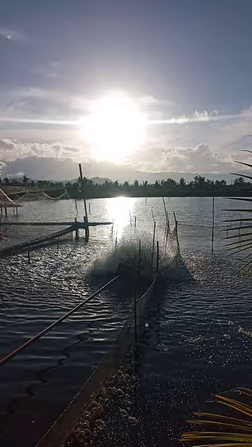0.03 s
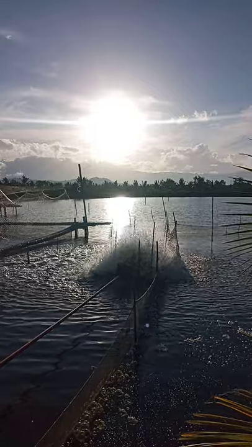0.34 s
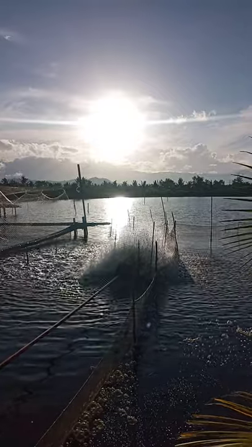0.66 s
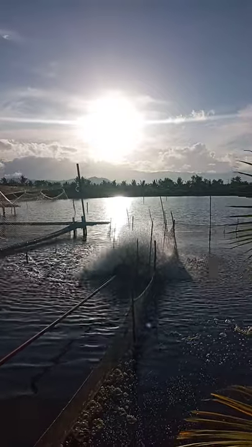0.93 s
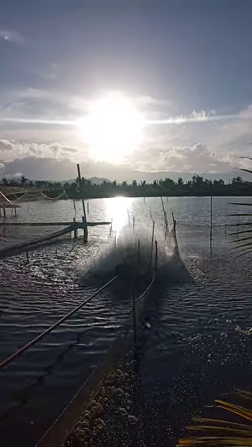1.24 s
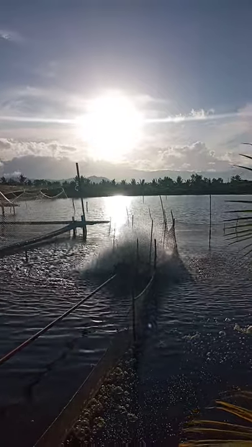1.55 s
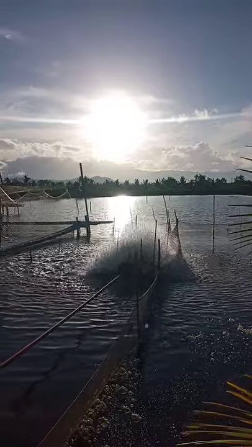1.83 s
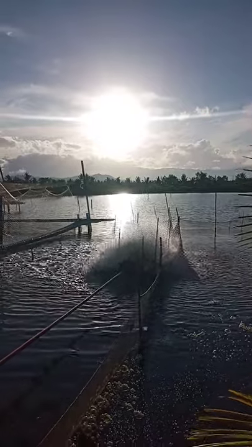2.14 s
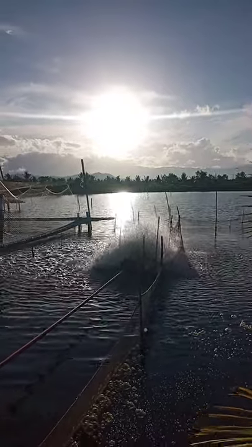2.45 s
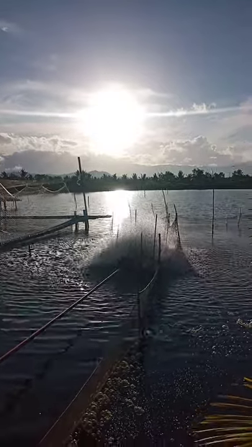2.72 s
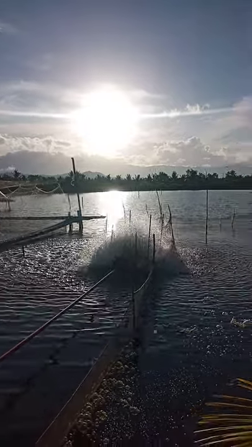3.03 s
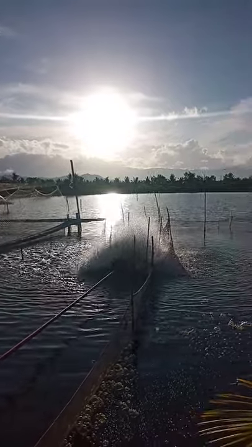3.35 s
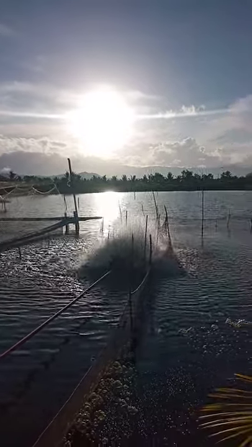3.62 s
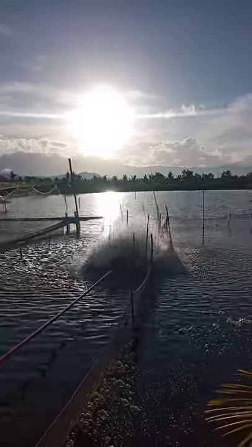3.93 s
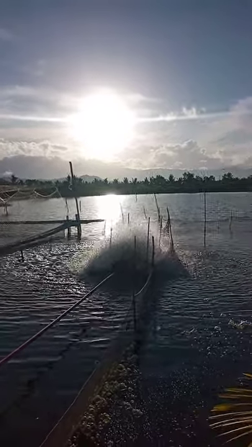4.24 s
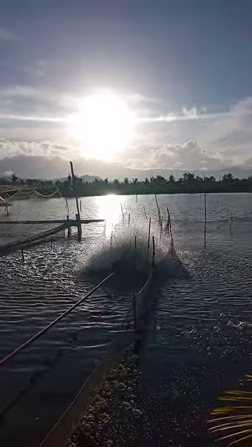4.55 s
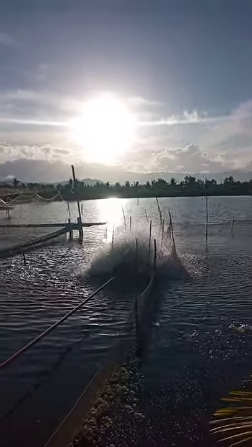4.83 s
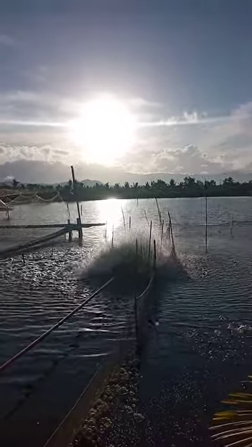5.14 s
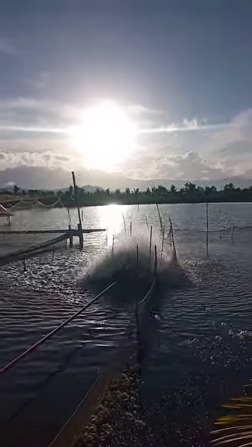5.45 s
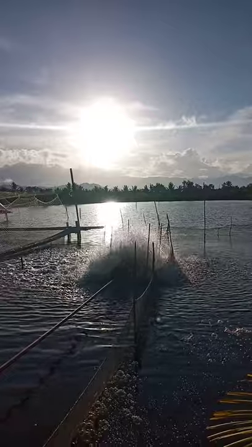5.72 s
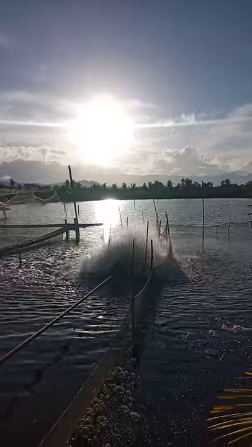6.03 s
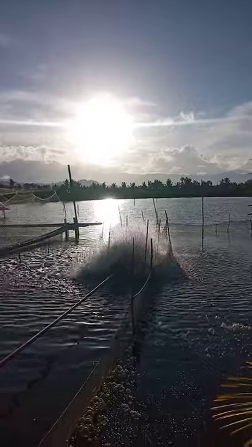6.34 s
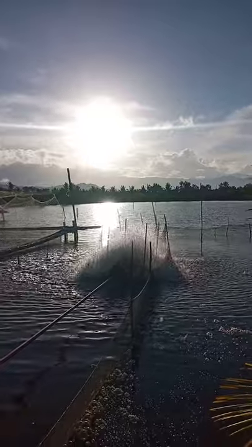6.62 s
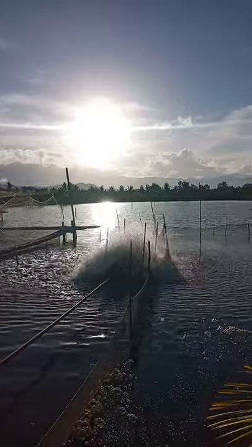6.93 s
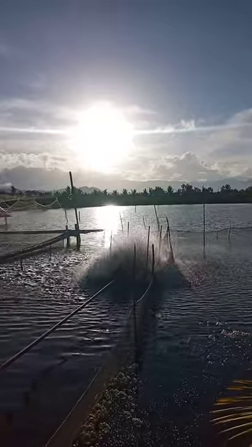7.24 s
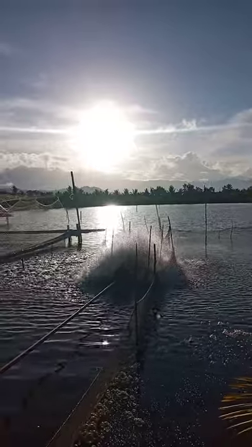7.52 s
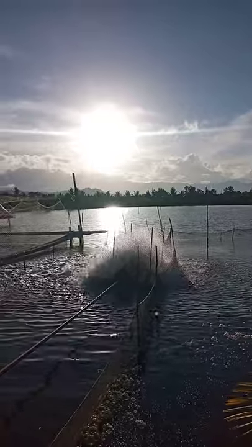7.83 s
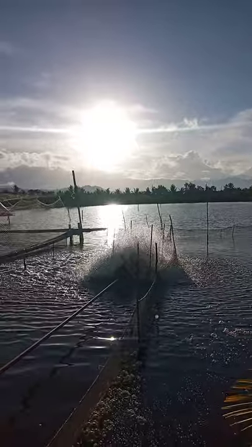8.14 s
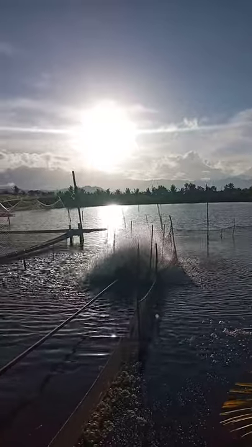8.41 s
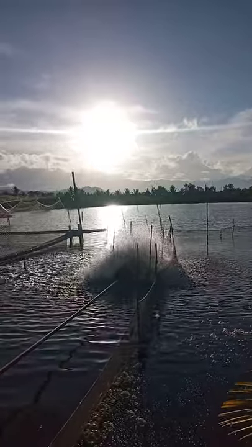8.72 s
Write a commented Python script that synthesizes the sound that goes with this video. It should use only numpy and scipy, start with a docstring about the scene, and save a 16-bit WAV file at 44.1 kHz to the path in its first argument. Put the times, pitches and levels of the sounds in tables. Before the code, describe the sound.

After a short silence, the sound fades in between about 0.4 and 0.7 seconds: a single-cylinder diesel engine driving a paddle wheel aerator, heard outdoors from the bank of a pond. The engine sits to the left and chugs rapidly and evenly, around fifteen beats a second. Each beat combines a sharp, ringing exhaust bark with a low thump and a hollow pop, while rasping gas and metallic clatter pulse in step. Beneath it, the paddles throw a continuous rush of spray, dense with small pattering drops. The drive belt adds very faint, thin, high chirps on the right, with slightly stronger slips now and then from about 2 seconds onward. The exhaust bark edges gradually toward the centre, and the engine and splashing carry on at a nearly constant pace and level until the end, at about 9 seconds.

```python
"""A single-cylinder diesel on the bank of a pond drives a paddle wheel aerator through a long shaft.
About 14.6 times a second the engine barks through its silencer, gulps air and shuts a valve with a
hollow pop. Gas rasps and the block clatters in step, the drive belt chirps thinly, and the wheel throws
a steady spray. The sound fades in with the engine on the left; its bark edges towards the centre."""
import sys
import numpy as np
from scipy import signal
from scipy.fft import rfft, irfft, next_fast_len
from scipy.io import wavfile
from scipy.ndimage import uniform_filter1d, map_coordinates

SR = 44100
rng = np.random.default_rng(int(sys.argv[2]) if len(sys.argv) > 2 else 0)


def transcribe(signal):
    """Save signal, clipped to [-1, 1], as a 16-bit WAV file at the path in sys.argv[1]."""
    frames = np.atleast_2d(signal).T
    limited = np.clip(frames, -1, 1)
    pcm = np.round(limited * 32767).astype(np.int16)
    wavfile.write(sys.argv[1], SR, pcm)


N = 391166
T = np.arange(N) / SR

# Noise envelopes over one engine cycle: cycle_fraction, rasp_db, clatter_db
CYCLE_ENVELOPES = [(0, -3, -6), (.06, 0.5, -2), (.16, 0, 0.5), (.33, 2, -1.5), (.5, -8, -3.5), (.7, -5, -5),
                   (.85, 0, -5), (.96, -8, -7.5)]


def bark(firings, jitter_s, stroke_db, scatter_db):
    """Each firing lets a few surges of gas ring the silencer, never quite alike."""
    # Gas surges in one bark: delay_s, level_db, right_minus_left_db
    surges = [(.00105, -4.5, -4.4), (.00385, 2.2, -6.9), (.01007, -.5, -6.4), (.01564, -6.9, -11.7),
              (.01771, -.6, -12)]
    # Silencer resonances: pitch_hz, level_db, t60_s
    silencer_modes = [(770, -28.5, 0.053), (910, -19.5, 0.039), (1202, -4, 0.056), (1265, -10, 0.069),
                      (1490, -30, 0.014), (1837, -12.5, 0.043)]
    starts = firings + jitter_s * rng.standard_normal(len(firings))
    strength_db = stroke_db * rng.standard_normal(len(firings))
    blows = np.zeros((2, N))
    for delay, db, right_db in surges:
        sizes = amp(db + strength_db + scatter_db * rng.standard_normal(len(firings)))
        blows += pulses(starts + delay, sizes) * amp([[0], [right_db]])
    ringing = ring(blows, silencer_modes, lag_s=.00066)
    return unit(chamber(ringing, centre_hz=1220, width_hz=300, outside_db=-4))


def intake_thump(firings, gulp_delay_s, pop_delay_s, scatter_db, pop_db):
    """The piston sucks at the intake, then the valve shuts on the column of air."""
    # Intake resonances: pitch_hz, level_db, t60_s
    intake_modes = [(87.9, -21.5, 0.41), (131.5, -7, 0.084), (215, -27, 0.063), (231, -49, 0.13),
                    (406, -31, 0.18)]
    # Resonances of the valve's pop: pitch_hz, level_db, t60_s
    valve_modes = [(333.8, -25.5, 0.24), (430, -20.5, 0.053), (521, -5.5, 0.038), (930, -19, 0.23)]
    sizes = lambda: amp(scatter_db * rng.standard_normal(len(firings)))
    suction = -pulses(firings + gulp_delay_s, sizes()) * amp([[0], [-4.2]])
    shutting = pulses(firings + pop_delay_s, sizes()) * amp([[0], [-3.5]])
    gulp = ring(suction, intake_modes, lag_s=.00063)
    pop = chamber(ring(shutting, valve_modes, lag_s=.00066), centre_hz=480, width_hz=280, outside_db=-6)
    return unit(gulp + amp(pop_db) * pop)


def block_clatter(cycles):
    """The block clatters in step with the crank: pulsing noise with ringing peaks."""
    # Broad tone of the clatter: frequency_hz, level_db
    spectrum = [(700, -11), (1800, 3.5), (3000, -5), (4200, -2), (5000, -5.5), (6000, -1), (7400, -3.5),
                (8200, -16), (9500, -24.5), (11000, -20.5), (13900, -43.5), (14700, -17.5), (16000, -47)]
    # Ringing peaks in the clatter; the two near 6 kHz are the ring of splashing water:
    # pitch_hz, width_hz, boost_db
    ring_peaks = [(1875, 70, 6), (2480, 71, 7.5), (3510, 260, 5), (4220, 54, 5.5), (5900, 62, 6.5),
                  (6530, 240, 3), (7500, 150, 2.5)]
    fraction, _, envelope_db = np.transpose(CYCLE_ENVELOPES)
    noise = flicker(pulsing_noise(cycles, fraction, envelope_db), depth_db=1.2)
    peaks_db = lambda hz: sum(db / (1 + (2 * (hz - f) / width) ** 2) for f, width, db in ring_peaks)
    return spread(noise, lambda hz: eq_db(spectrum, hz) + peaks_db(hz), alike_hz=900, lag_s=.00073)


def gas_rasp(cycles):
    """Gas rasps behind each bark."""
    # Tone of the rushing gas: frequency_hz, level_db
    spectrum = [(40, -44), (90, -5.5), (300, -11), (500, -1), (750, 3), (880, -6.5), (1200, -16),
                (1500, -3.5), (2000, -2.5), (2600, -9.5), (4000, -30), (8000, -41)]
    fraction, envelope_db, _ = np.transpose(CYCLE_ENVELOPES)
    noise = pulsing_noise(cycles, fraction, envelope_db)
    return spread(noise, lambda hz: eq_db(spectrum, hz), alike_hz=1140, lag_s=.0005)


def paddle_spray(drops_per_s, drop_hz, decay_cycles, drops_db, surge_db):
    """The paddles throw a sheet of water that falls back as a rush with countless drops in it."""
    # Tone of the falling water: frequency_hz, level_db
    spectrum = [(25, -10), (60, -8), (300, -4.5), (1000, 2.5), (2500, -4.5), (5000, -9.5), (7400, -3.5),
                (8300, -19), (11000, -25.5), (13900, -26.5), (14700, -11), (16000, -17)]
    count = int(drops_per_s * N / SR)
    onset, pitch, size, side = rng.random((4, count))
    t = np.arange(300) / SR
    drop_pitch_hz = drop_hz * 2 ** (3 * (pitch[:, None] - .5))  # three octaves of drops
    gains = (.0011 + size[:, None]) ** -.3  # many faint, a few loud
    drops = gains * np.sin(2 * np.pi * drop_pitch_hz * t) * np.exp(-drop_pitch_hz * t / decay_cycles)
    samples = (onset[:, None] * N).astype(int) + np.arange(len(t))
    sides = [side < .5, side >= .5]
    patter = np.array([np.bincount(samples[s].ravel(), drops[s].ravel(), N)[:N] for s in sides])
    water = unit(rng.standard_normal((2, N))) + amp(drops_db) * unit(patter)
    water *= amp(surge_db * wobble(9))
    return spread(water, lambda hz: eq_db(spectrum, hz), alike_hz=700, lag_s=.0008)


def belt_chirps(cycles, centre_hz, half_width_hz, swell_s, rub_db, scatter_db, slip_trim_db):
    """The belt chirps on the right once each turn of the crank; now and then it slips harder."""
    # Harder slips of the belt: time_s, level_db
    hard_slips = [(1.9909, -35), (2.7472, -36), (4.4674, -38), (5.1544, -35), (5.3607, -34), (7.1084, -33),
                  (7.2734, -34), (7.9764, -36), (8.5404, -35), (8.776, -34)]
    hiss = filtered(rng.standard_normal(N), lambda hz: 1 / (1 + ((hz - centre_hz) / half_width_hz) ** 2))
    turns = np.interp(np.arange(.36, cycles[-1], .5), cycles, T)  # two turns a cycle
    rubs = pulses(turns, amp(rub_db + scatter_db * rng.standard_normal(len(turns)))) * drift(.4)
    slip_s, slip_db = np.transpose(hard_slips)
    slips = pulses(slip_s, amp(slip_db + slip_trim_db))
    swell = np.exp(-((np.arange(SR // 10) / SR - .05) / swell_s) ** 2)
    envelope = signal.fftconvolve(rubs + slips, swell, "same")
    return hiss / hiss.std() * envelope * amp([[-11], [0]])


def pulsing_noise(cycles, fraction, envelope_db, rough_db=1.33, stroke_db=1.1):
    """Two noises follow an envelope each engine cycle, with fast grit and uneven strokes."""
    level_db = np.interp(cycles, fraction, envelope_db, period=1)
    return rng.standard_normal((2, N)) * amp(level_db + rough_db * wobble(300) + stroke_db * wobble(25))


def flicker(x, depth_db):
    """Random patches of gain, a few hundred Hz wide and some 50 ms long."""
    spectra = signal.stft(x, nperseg=512)[2]
    patches = uniform_filter1d(rng.standard_normal(spectra.shape[1:]), size=6, axis=0)
    patches = uniform_filter1d(patches, size=9, axis=1)
    return signal.istft(spectra * amp(depth_db * patches / patches.std()), nperseg=512)[1][:, :N]


def ring(blows, modes, lag_s):
    """Stereo blows ring a set of modes; the right side leads by lag_s."""
    t = np.arange(SR // 2) / SR
    response = sum(amp(db - 60 * t / t60) * np.sin(2 * np.pi * hz * t) for hz, db, t60 in modes)
    left, right = signal.fftconvolve(blows, response[None], axes=1)[:, :N]
    return np.array([left, filtered(right, lambda hz: np.exp(2j * np.pi * hz * lag_s))])


def chamber(x, centre_hz, width_hz, outside_db):
    """A chamber passes one band freely and weakens the rest."""
    passband = lambda hz: 1 / (1 + (2 * (hz - centre_hz) / width_hz) ** 4)
    return filtered(x, lambda hz: amp(outside_db * (1 - passband(hz))))


def spread(pair, tone_db, alike_hz, lag_s):
    """Two unrelated signals become left and right: alike in the bass, the right shaded and early."""
    # Shading of the right side: frequency_hz, right_minus_left_db
    shade = [(100, 0.5), (500, -2.5), (1200, -9), (2000, -9.5), (3200, -7), (4300, -9), (5900, -11),
             (7300, -18), (8300, -11), (9500, 2), (11800, 1), (13800, 0.5), (16000, -18)]
    alike = lambda hz: 1 / (1 + hz / alike_hz)
    shared = filtered(pair[0], lambda hz: alike(hz) * np.exp(2j * np.pi * hz * lag_s))
    right = shared + filtered(pair[1], lambda hz: np.sqrt(1 - alike(hz) ** 2))
    side_gains = lambda hz: amp([tone_db(hz), tone_db(hz) + eq_db(shade, hz)])
    return unit(filtered(np.array([pair[0], right]), side_gains))


def pulses(times, sizes):
    """Impulses that may fall between samples."""
    at = times * SR
    taps = np.floor(at).astype(int)[:, None] + np.arange(-7, 9)
    gap = taps - at[:, None]
    shape = np.sinc(gap) * np.sinc(gap / 8)
    return np.bincount(np.clip(taps, 0, N).ravel(), (sizes[:, None] * shape).ravel(), N + 1)[:N]


def filtered(x, response):
    """Shape x with a frequency response."""
    m = next_fast_len(N + SR // 2)
    return irfft(rfft(x, m) * response(np.fft.rfftfreq(m, 1 / SR)), m)[..., :N]


def eq_db(points, hz):
    """An EQ curve through (frequency_hz, level_db) points on a log axis."""
    point_hz, db = np.transpose(points)
    return np.interp(np.log(hz + 1), np.log(point_hz + 1), db)


def wobble(rate):
    """A smooth random curve, rate knots a second."""
    return map_coordinates(rng.standard_normal(int(N * rate / SR) + 4), [T * rate])


def drift(db_per_s):
    """A steady fader move, at unity halfway through."""
    return amp(db_per_s * (T - T.mean()))


def pan_right(db_per_s):
    """Left and right gains of a steady pan to the right."""
    return np.array([drift(-db_per_s / 2), drift(db_per_s / 2)])


def amp(db):
    """Decibels to gain."""
    return 10 ** (np.asarray(db) / 20)


def unit(x):
    """Scale a stereo pair so that its mid signal has rms 1."""
    return x / np.sqrt(np.mean(x.mean(0) ** 2) + 1e-20)


def scene():
    """The engine and the wheel, heard from the bank."""
    # The engine creeps up in speed, then eases: time_s, firings_per_s
    speed = [(0, 14.428), (3, 14.555), (7.2, 14.646), (8, 14.599), (8.9, 14.579)]
    cycles = np.cumsum(np.interp(T, *np.transpose(speed))) / SR
    firings = np.interp(np.arange(1, int(cycles[-1]) + 1), cycles, T)
    rasp = gas_rasp(cycles)
    clatter = block_clatter(cycles)
    barks = bark(firings, jitter_s=.00006, stroke_db=.6, scatter_db=.5)
    thumps = intake_thump(firings, gulp_delay_s=.0184, pop_delay_s=.0369, scatter_db=.1, pop_db=4)
    chirps = belt_chirps(cycles, centre_hz=10530, half_width_hz=650, swell_s=.013,
                         rub_db=-48.5, scatter_db=4, slip_trim_db=-5)
    spray = paddle_spray(drops_per_s=1000, drop_hz=3010, decay_cycles=2.07, drops_db=-8, surge_db=1.5)
    mix = amp(-24.5) * drift(-.01) * pan_right(.45) * barks
    mix += amp(-24) * drift(.25) * thumps
    mix += amp(-28.3) * drift(.24) * clatter
    mix += amp(-30.5) * drift(.25) * rasp
    mix += amp(-28.5) * spray + chirps
    return mix * pan_right(.07)


def record(dry):
    """Cut the deep bass, add a faint rumble, fade in after a short silence and trim the very top."""
    low_cut_hz, high_cut_hz = 69, 15850
    fade_start_s, fade_s = .368, .33
    sound = filtered(dry, lambda hz: 1 / np.sqrt(1 + (low_cut_hz / (hz + 1)) ** 30))
    rumble = filtered(rng.standard_normal(N), lambda hz: hz / (hz + 25) / (1 + (hz / 70) ** 4))
    sound += amp(-55.5) * unit(rumble * amp([[3.5], [0]]))
    fade = np.clip((T - fade_start_s) / fade_s, 0, 1)
    return filtered(sound * fade, lambda hz: np.clip((high_cut_hz - hz) / 100, 0, 1))


dry = scene()
out = record(dry)
transcribe(out)
```